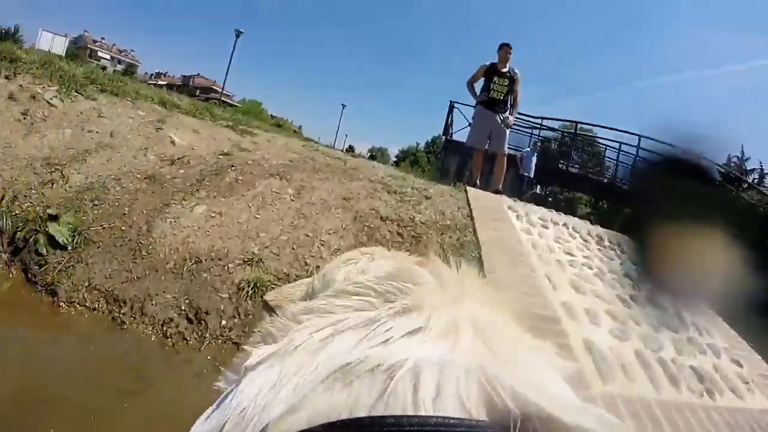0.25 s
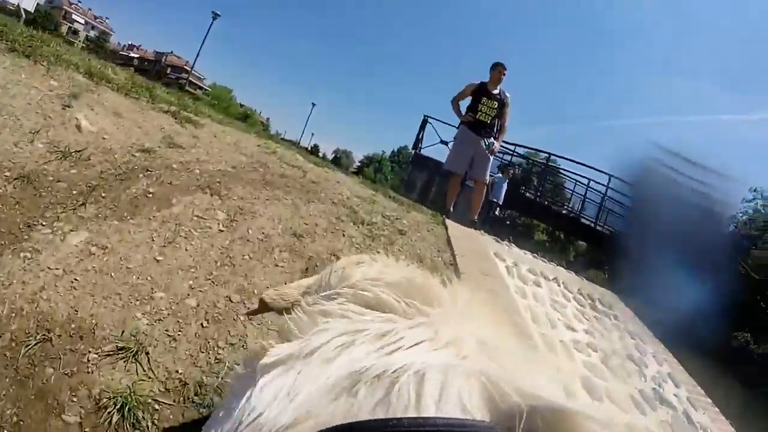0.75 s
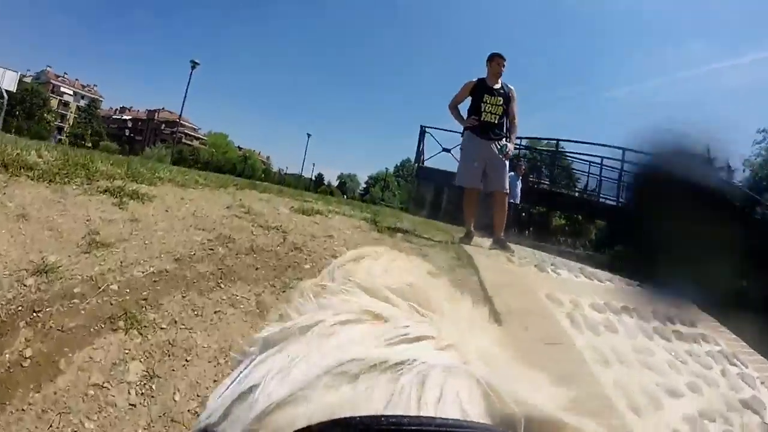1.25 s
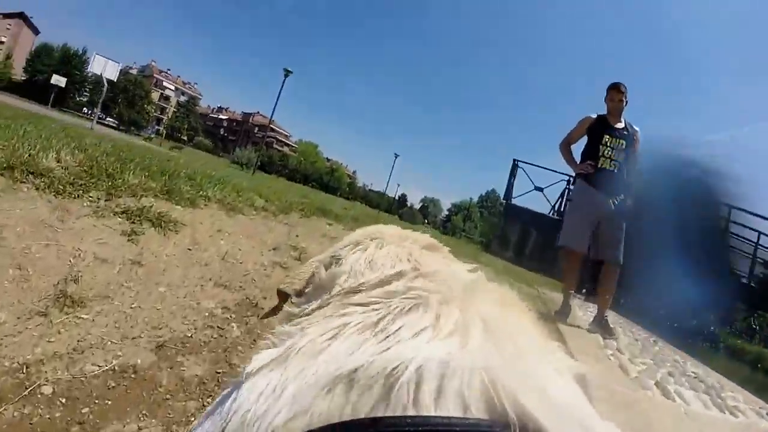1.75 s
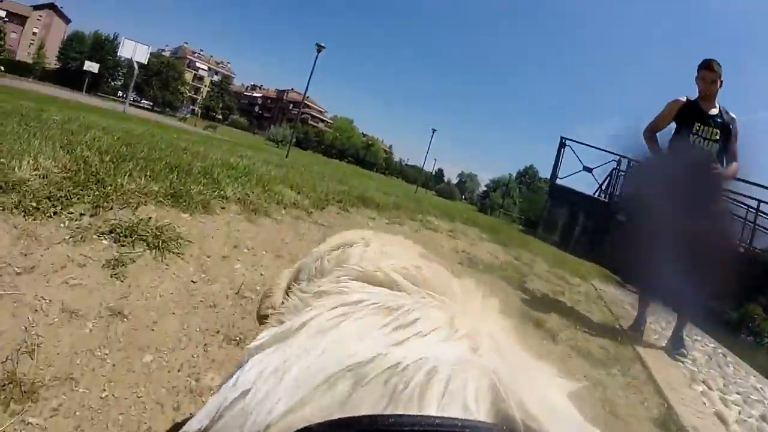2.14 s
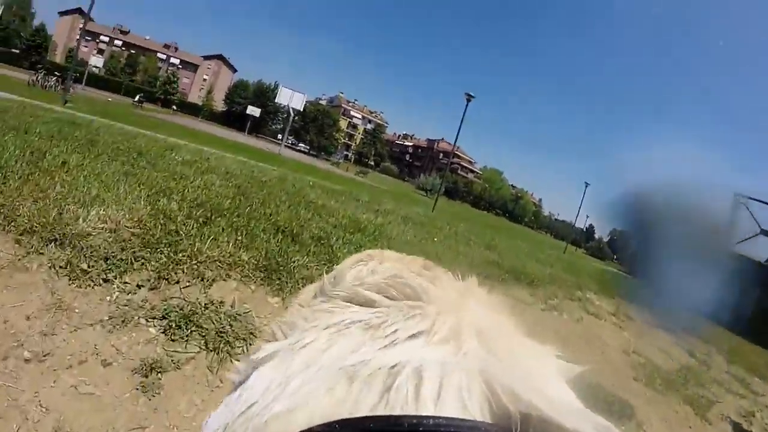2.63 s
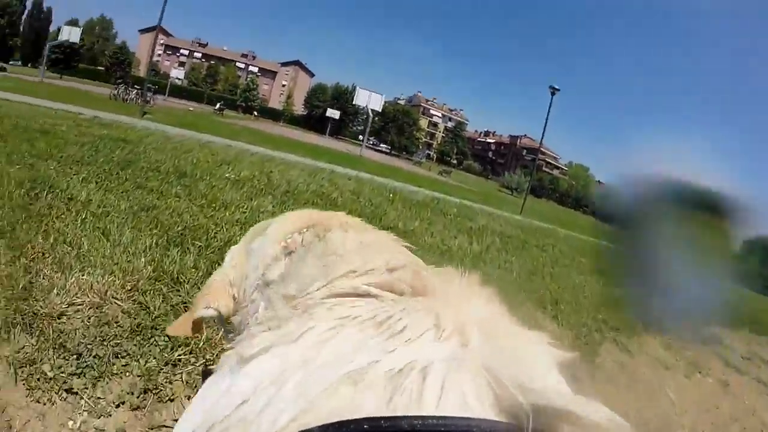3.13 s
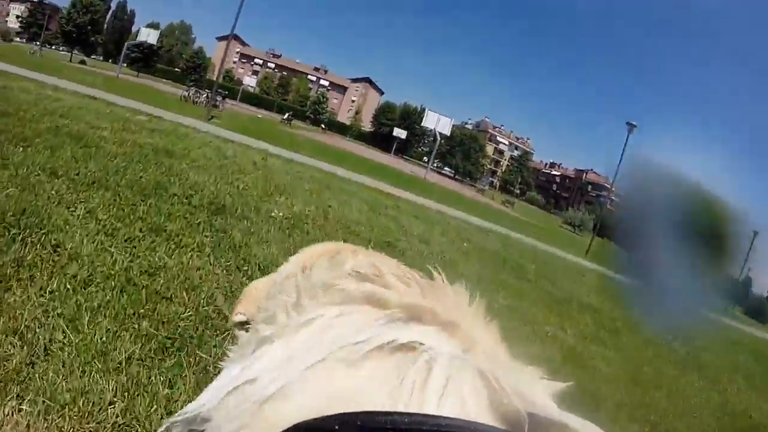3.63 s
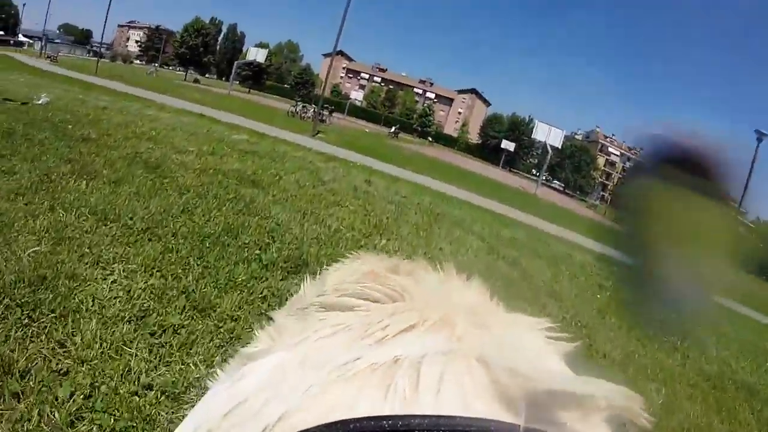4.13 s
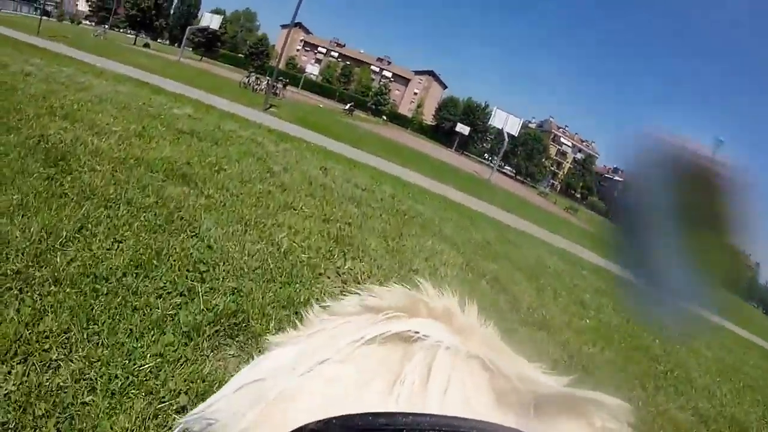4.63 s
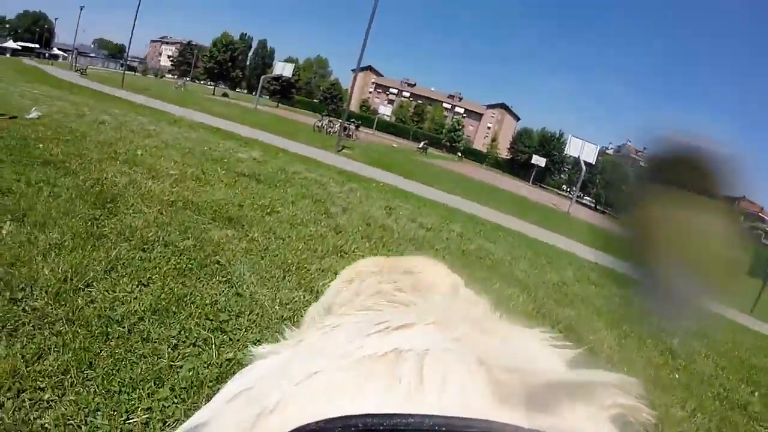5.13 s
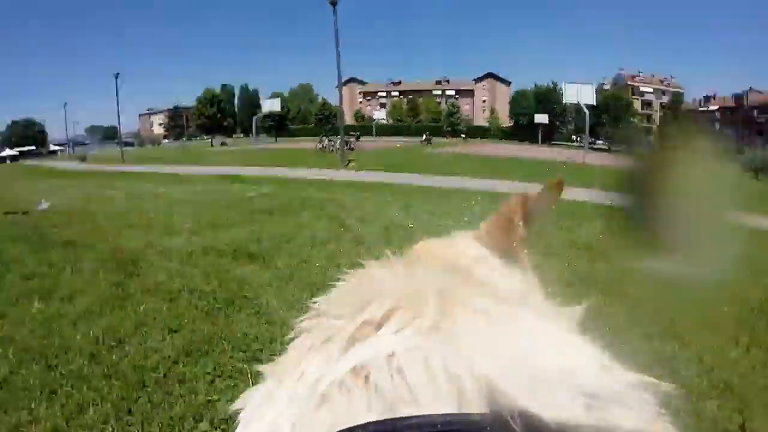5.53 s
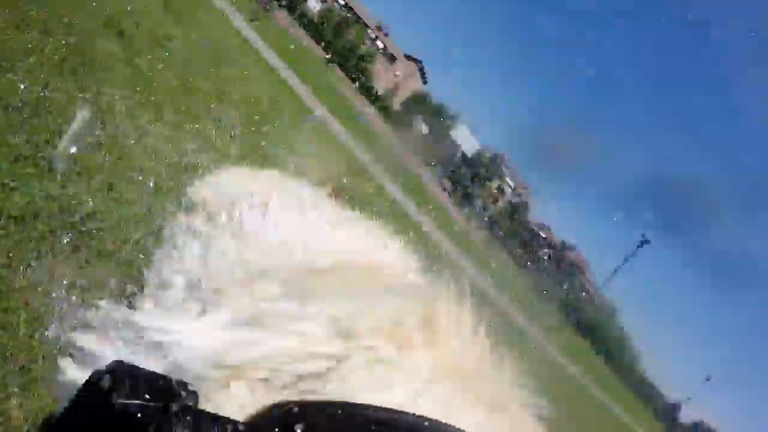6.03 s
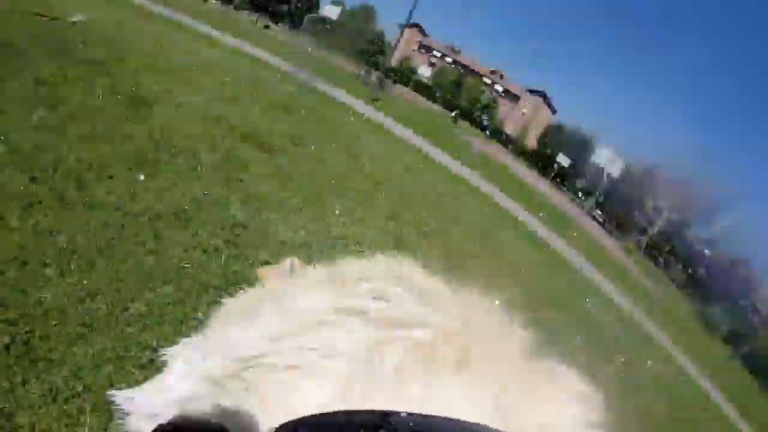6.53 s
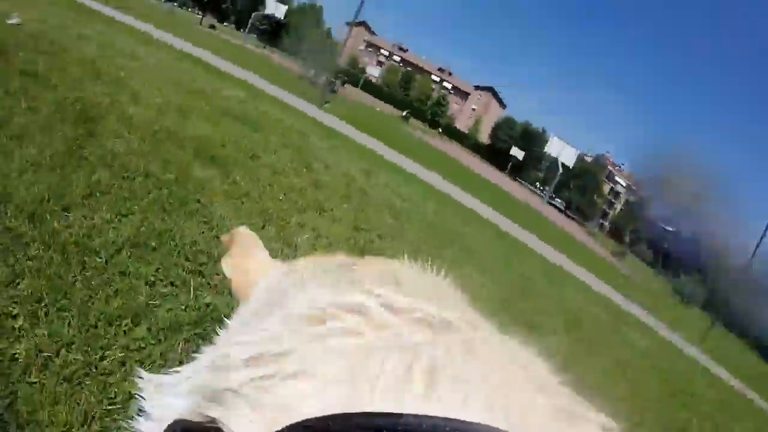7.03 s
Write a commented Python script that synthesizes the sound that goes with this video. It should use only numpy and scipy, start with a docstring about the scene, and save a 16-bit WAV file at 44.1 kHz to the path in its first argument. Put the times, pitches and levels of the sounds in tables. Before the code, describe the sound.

A wet dog climbs a bank, water spattering and plopping off its coat, hard knocks hit the camera case, then it shakes vigorously.

```python
"""A soaked dog climbs a canal bank with a camera in a waterproof case strapped to its back.
First, water streams off its coat: noise grains and small bubbles spatter, splash and gurgle.
Its steps rock the mount as swells of low noise, while short clacks and ringing modes knock the case.
Then it shakes itself on the grass: each twist flings grains of spray at the case, the wet coat flaps
and the buckle clacks, while low pulses jolt the harness. A quiet hush of noise lies under it all."""
import sys
import numpy as np
from scipy import signal
from scipy.io import wavfile
from scipy.ndimage import uniform_filter1d, minimum_filter1d

SR = 44100
rng = np.random.default_rng(int(sys.argv[2]) if len(sys.argv) > 2 else 0)


def log_audio(samples):
    """Write samples as a 16-bit WAV file to the path given in sys.argv[1]."""
    # one column per channel
    frames = np.atleast_2d(samples).T
    # limit to full scale, then quantise
    limited = np.clip(frames, -1, 1)
    pcm = np.round(limited * 32767).astype(np.int16)
    wavfile.write(sys.argv[1], SR, pcm)


N = 321048
T = np.arange(N) / SR  # time of every sample [s]

# Levels in the tables are relative: the sources below may scale them further.
# colour of the outdoor hush: (frequency [Hz], level per Hz [dB])
AIR_TONE = [(88, -29.5), (150, -3.5), (209, -5), (504, -9.5), (555, -10), (1210, -15.5), (1600, -17.5),
            (2270, -18), (7040, -32), (12200, -40), (14000, -52.5), (16000, -69)]
# slow level changes of the hush: (time [s], level [dB])
HUSH_LEVEL = [(0, -0.5), (5.55, 0), (5.75, 1.5), (6.7, -6), (7.28, -5.5)]

# water running off the coat: (time [s], level [dB])
RUNOFF_LEVEL = [(0.0, -46.5), (0.24, -51), (0.33, -45), (.46, -47.5), (.55, -45), (0.70, -46.5),
                (.8, -51.5), (.88, -49.5), (1.0, -53.5), (1.3, -58.5), (1.85, -67)]
# its spatter on the bank, with the hollow resonances of the case: (frequency [Hz], level per Hz [dB])
RUNOFF_TONE = [(150, -3.5), (350, 0), (620, -7), (750, 0), (1100, -2), (1250, -.5), (1350, -3), (1500, 3),
               (1620, -2.5), (1780, 4.5), (2000, 0.5), (2220, -5), (2750, -2.5), (2950, -9.5), (3250, -5.5),
               (4200, -14.5), (4600, -10.5), (5000, -17.5), (6500, -17), (9500, -25), (13000, -29),
               (16000, -65)]
# a gush leaves the coat all at once: (time [s], level [dB])
GUSHES = [(0.305, -64), (0.67, -47), (0.835, -51), (1.214, -44), (1.747, -43.5)]
# thin trickles tick on the stones: (time [s], level [dB])
TRICKLE_LEVEL = [(.05, -89), (.12, -54.5), (.25, -66), (.56, -61), (.72, -56.5), (.9, -61), (1.12, -67),
                 (1.2, -54.5), (1.27, -65)]
# their fine ticking: (frequency [Hz], level per Hz [dB])
TRICKLE_TONE = [(1000, -23), (2700, 6), (4500, 0), (5200, 0), (6400, 2), (8000, -17), (9300, -8),
                (13000, -18), (16000, -31)]

# lumps of water splash into the shallows: (time [s], level [dB], centre frequency [Hz], decay [s])
SPLASHES = [(.306, -37, 1580, 0.0067), (.31, -38.5, 950, 0.007), (.319, -33, 600, .005),
            (.329, -37, 1100, 0.01), (0.346, -43, 520, .005), (.491, -30.5, 770, 0.0047),
            (.492, -31, 417, 0.0066), (0.491, -36, 1200, 0.0045), (.676, -41, 2500, .012),
            (.531, -40, 850, .012), (.536, -38, 1350, 0.01), (0.55, -45, 4050, 0.01),
            (.725, -42, 1400, 0.023), (.841, -35, 1080, 0.0058), (1.007, -41.5, 1430, 0.018),
            (1.044, -45.5, 1720, .02), (1.216, -37, 1920, 0.0054), (1.358, -46, 2040, 0.0067),
            (1.737, -40, 1650, 0.0036), (1.746, -47, 2200, 0.013)]
# single drops plop and plink: (time [s], level [dB], bubble frequency [Hz])
PLOPS = [(.01, -36.5, 518), (.042, -35, 1570), (.078, -37, 3140), (.095, -35.5, 1770), (.105, -36, 6640),
         (.151, -48, 3370), (.215, -40, 4500), (.309, -29, 1680), (.493, -33, 745), (.535, -33, 710),
         (.537, -41, 1250), (.538, -29, 1450), (.631, -30, 1580), (.671, -35, 3200), (.696, -32, 1720),
         (.774, -40, 9100), (.842, -36, 3440), (.851, -32, 1700), (.879, -30.5, 1740), (1.012, -40, 1170),
         (1.046, -31, 2010), (1.056, -36, 1530), (1.119, -40, 6530), (1.218, -34, 1850)]
# a hollow in the water fills: (time [s], level [dB], length [s], starting frequency [Hz])
GURGLES = [(0.364, -39.5, 0.045, 1040), (.548, -39, .055, 765)]

# low rumble of the sway: (frequency [Hz], level per Hz [dB])
SWAY_TONE = [(8, -21.5), (15, 11.5), (24, 4), (38, 0), (52, -13.5), (75, -33), (140, -63), (400, -120)]
# low rumble of the thuds: (frequency [Hz], level per Hz [dB])
THUD_TONE = [(30, -26), (48, -0.5), (62, 0.5), (80, -6.5), (105, -13.5), (150, -29), (250, -39.5),
             (600, -64), (1500, -120)]
# strides up the bank, mostly about 0.4 s apart: (time [s], sway of the body [dB])
STRIDES = [(0.0, -15), (0.46, -21), (0.84, -17.5), (1.208, -14.5), (1.588, -14.5), (1.92, -16),
           (2.36, -18.5), (2.77, -24), (3.16, -23.5), (3.568, -19.5), (3.95, -22.5), (4.46, -19.5),
           (4.74, -23.5), (4.96, -31.5), (5.15, -31.5), (5.38, -20)]
# each paw lands: (time [s], thud [dB])
PAWS = [(.13, -34.5), (.27, -39), (.475, -29.5), (.70, -29), (.84, -28), (.95, -29.5), (1.215, -37),
        (1.27, -27.5), (1.39, -37), (1.585, -30), (1.735, -39), (1.915, -27.5), (2.02, -54), (2.13, -38.5),
        (2.375, -30), (2.5, -39), (2.79, -24), (2.88, -38), (3.03, -47), (3.175, -34.5), (3.3, -42),
        (3.575, -33), (3.7, -44.5), (3.97, -32), (4.1, -49.5), (4.475, -27), (4.59, -36.5), (4.745, -38.5),
        (4.88, -41.5), (4.98, -38), (5.11, -31.5), (5.24, -42), (5.41, -31)]
# vigour of the shake, from the head back to the rump: (time [s], level [dB])
SHAKE_LEVEL = [(5.56, -13.5), (5.68, -9.5), (5.95, -13), (6.45, -14.5), (6.75, -14), (7.15, -10),
               (7.28, -20)]
# the harness snaps taut: (time [s], peak level [dB])
JOLTS = [(0.493, -16), (0.97, -16), (1.752, -18.5), (2.445, -22), (3.612, -15), (3.72, -19), (5.72, -6.5),
         (5.927, -3), (6.117, -4), (6.305, -4), (6.48, -3), (6.696, -8), (6.825, -10.5), (6.913, -11),
         (6.958, -4.5), (7.078, -4), (7.152, -11)]
# the swing gets faster once the shake has passed the shoulders: (time [s], frequency [Hz])
SWING_RATE = [(6.5, 28.5), (6.8, 47)]

# short grainy scuffs, scrapes and soft thumps of strap, coat and mount:
# (loudest time [s], level [dB], half length [s], centre frequency [Hz], Q [-])
SCUFFS = [(1.421, -54, 0.043, 890, 1.4), (1.954, -36.5, 0.011, 374, 2.8), (1.955, -36.5, 0.011, 1020, 0.79),
          (2.013, -55, 0.06, 1040, 0.73), (2.601, -53, 0.05, 870, 1.3), (2.782, -59, 0.037, 2130, 2.3),
          (4.072, -55.5, 0.057, 990, 2.2), (4.577, -43.5, 0.0095, 456, 0.66),
          (4.581, -56, 0.028, 2024, 3.1), (4.585, -45.5, 0.0098, 730, 2.5), (4.612, -36, 0.0058, 318, 1.3),
          (4.697, -53.5, 0.034, 1690, 3.7), (4.688, -55.5, 0.036, 2470, 4), (5.084, -62, 0.06, 1870, 1.25),
          (5.447, -50.5, 0.034, 2360, 2.3), (5.45, -54.5, 0.05, 1180, 0.88),
          (6.864, -48.5, 0.0064, 750, 0.67), (6.912, -54, 0.013, 750, 0.49),
          (6.991, -45.5, 0.0073, 750, 0.8), (7.044, -52.5, 0.0076, 750, 0.45),
          (7.115, -55, 0.0082, 750, .7)]

# mount and harness strike the case, most often in quick bounces: (time [s], strength [dB],
# clack pitch [Hz], clack length [cycles], ringing of the case [dB], push on the mount [dB])
KNOCKS = [(1.947, -24.5, 1990, 1.3, -12, 0), (1.952, -28, 1890, 0.49, -21, -9),
          (1.955, -25.5, 2300, 1.4, -1, 1.5), (1.961, -28, 1910, 0.76, -11, -17),
          (2.330, -22.5, 750, 0.62, -16, -10), (2.3319, -8, 2170, 1.17, -10.5, -23.5),
          (2.3326, -14.5, 3040, 1, -29, -28), (2.3352, -20.5, 2130, 1.1, -5, -23),
          (2.623, -26, 830, 1.4, -2, -7.5), (2.627, -11.5, 3250, 3.6, -4, -39),
          (2.6281, -5.5, 2500, 1.8, -3.5, -31.5), (2.6269, -19.5, 467, 0.73, -20, -20),
          (2.6282, -23, 5670, 7.5, -22, -40), (2.629, -14.5, 1220, 1.6, -7, -12.5),
          (2.6308, -15, 1690, 1, -8, -34), (2.6324, -20, 2550, 0.82, -9.5, -13),
          (2.6373, -25.5, 1800, 0.32, 3, -5.5), (2.6416, -32, 2200, .9, -6.5, -21),
          (2.654, -38.5, 1900, .6, -3, -20), (2.659, -35, 2400, 0.83, -3, -25),
          (2.666, -38, 1100, 0.45, -3, -20), (2.6693, -34, 2300, 0.63, -5, -25),
          (2.6915, -36, 2160, 0.8, -9, -27), (4.2738, -7.5, 2980, 0.78, -5.5, -39),
          (4.2757, 11.5, 2440, 0.78, -12.5, -38), (4.2787, -3, 900, 0.53, -12.5, -15.5),
          (4.2799, 8.5, 1536, 0.94, -13.5, -23), (4.2827, -3.5, 1520, 1.4, -9.5, -26),
          (4.3273, -14.5, 2300, 0.72, -8, -34), (4.328, -22, 1544, 0.88, -15.5, -39),
          (4.351, -18.5, 2100, 0.32, -7, -31), (4.3526, -26, 1580, 0.97, -15, -29.5),
          (4.3705, -31.5, 2515, 0.8, -14, -30), (4.372, -34.5, 1520, 1, -14, -36),
          (5.5542, -15.5, 970, 0.33, -34, -5), (5.5554, -23, 1720, 0.57, -26, -19),
          (5.5801, -24, 610, 0.58, 5, 2), (5.583, -23, 2380, 0.55, 2, -15),
          (5.593, -0.5, 2280, 0.9, -16, -40), (5.642, -38, 1100, .4, -5, -10),
          (5.672, -27, 298, 0.43, -22, -2), (7.072, -40.5, 645, 0.19, -19, 13.5)]
# ringing modes of the camera case: (frequency [Hz], level [dB], time to fall 60 dB [s])
CASE_MODES = [(204, -28.5, 0.019), (515, -15, 0.014), (740, -6, 0.019), (1220, -3, 0.01),
              (1520, -2.5, 0.0081), (2320, -6, 0.026), (2550, -17, 0.0046), (3200, -2, 0.015),
              (4560, -10.5, 0.013), (5460, -10, 0.013), (5740, -16, 0.0081), (6740, -35.5, 0.0068),
              (7660, -20, 0.0064), (8820, -14.5, 0.0099), (11200, -35.5, 0.0015), (14260, -26.5, .005)]
# gritty scrape of a contact: (frequency [Hz], level per Hz [dB])
GRIT_TONE = [(200, -3), (700, 7), (3200, 4.5), (4800, -16.5), (5700, -12.5), (7000, -10.5), (9500, -13),
             (12000, -23), (16000, -39)]
# buzz of the loose mount after a contact: (frequency [Hz], level per Hz [dB])
BUZZ_TONE = [(300, -10.5), (1200, -6), (2300, -0.5), (3300, -7.5), (4500, -15), (5700, -13), (7000, -21.5),
             (10000, -24), (16000, -46)]
# a square hit leaves a metal part of the mount singing: (time [s], level [dB])
PINGS = [(2.332, -35), (4.277, -37), (5.594, -29)]

# twists of the body, about ten a second, then a few slow ones of the rump:
# (time [s], swish of the fur [dB], clack of the buckle [dB])
TWISTS = [(5.692, -30.5, -33), (5.799, -32, -31), (5.8976, -34.5, -20.5), (5.9891, -35.5, -18),
          (6.085, -35, -18), (6.184, -40, -21), (6.273, -37, -18.5), (6.3661, -41, -19),
          (6.453, -38.5, -19), (6.530, -42.5, -29), (6.626, -43.5, -22), (6.863, -54, -32),
          (6.992, -49, -30), (7.120, -44, -28)]
# slap of wet fur: (frequency [Hz], level per Hz [dB])
SLAP_TONE = [(150, 0), (400, 9.5), (750, 4), (950, -18.5), (1300, -8), (2300, -9), (3300, -12), (5000, -29),
             (16000, -51)]
# largest drops flung against the case: (time [s], peak level [dB], burst decay [s], treble [dB])
DROPS = [(5.5893, -11.5, 0.0024, 8), (5.692, -18.5, 0.0022, 8), (5.711, -13, 0.0014, -9),
         (5.737, -35, 0.0049, -9), (5.7522, -28.5, 0.0015, -22), (5.8026, -18, 0.0025, 8),
         (5.8153, -26, 0.004, 12), (5.824, -22, 0.0025, 17), (5.841, -37, 0.007, -1),
         (5.919, -35, 0.0033, 3), (5.926, -26, 0.004, -5), (5.953, -31, 0.0037, -21),
         (5.9594, -30, 0.0036, -22), (5.974, -39, 0.0029, -13), (6.006, -32, 0.0015, -1),
         (6.033, -41, 0.0018, 4), (6.044, -41, 0.0035, 9), (6.091, -20.5, 0.0022, 2),
         (6.112, -34.5, 0.0018, -7), (6.127, -42, .002, -1), (6.1426, -46, 0.0011, -8),
         (6.1593, -34, 0.0025, -6), (6.2027, -29.5, 0.0012, 8), (6.2967, -32, 0.0029, -4),
         (6.3774, -31, 0.0023, 5), (6.384, -39, .003, -3), (6.4054, -42, .002, -2),
         (6.469, -35, 0.0039, -14), (6.476, -43, 0.003, -12), (6.489, -47, .002, -14),
         (6.55, -39, .001, -7), (6.574, -46.5, .001, -14), (6.612, -43, 0.00091, -16),
         (6.648, -41, 0.0018, -18), (6.653, -41, .002, -16), (6.716, -46, 0.0011, -17),
         (6.826, -48, 0.0011, -7), (7.015, -46, 0.0018, -10), (7.1442, -40.5, 0.0035, 0),
         (7.2001, -38, .001, -2), (7.236, -49, .001, -13)]
# slap of a drop on the case: (frequency [Hz], level per Hz [dB])
DROP_TONE = [(200, 3.5), (900, -13), (1600, -5.5), (2400, 5.5), (3300, -0.5), (4800, -9), (5600, -1.5),
             (6500, -14), (7300, -19), (8800, -11), (10500, -20), (15000, -21), (16500, -44)]
# fine spray between the twists: (time [s], level [dB])
MIST_LEVEL = [(5.33, -69), (5.44, -54), (5.6, -46.5), (5.87, -43.5), (5.98, -37), (6.05, -46.5),
              (6.6, -46.5), (6.78, -54), (7.1, -55), (7.28, -63)]
# patter of the spray: (frequency [Hz], level per Hz [dB])
SPRAY_TONE = [(80, 18), (170, 15.5), (330, 6), (550, 4), (740, 5), (900, -2), (1200, 3.5), (1600, -5),
              (2300, -2.5), (2900, -12), (3500, -17.5), (4200, -26.5), (5700, -42), (7000, -49),
              (16000, -55.5)]
# fine droplets sizzle on the case: (frequency [Hz], level per Hz [dB])
SIZZLE_TONE = [(500, -32), (1500, -12.5), (2000, 10.5), (2500, 1), (3250, 1), (3800, -23), (4900, -25),
               (5500, -15.5), (6000, -9.5), (6600, -22), (9000, -28), (13000, -41), (16000, -44)]
# light taps of the slack buckle between its clacks: (time [s], level [dB])
TAPS = [(5.788, -28), (5.906, -34), (5.982, -25), (6.000, -37), (6.061, -26.5), (6.169, -27), (6.174, -31),
        (6.251, -32), (6.289, -35), (6.354, -31), (6.434, -29), (6.464, -33), (6.541, -26.5),
        (6.664, -32.5), (7.138, -44)]


def amp(db):
    """Turns decibels into a gain."""
    return 10 ** (np.asarray(db) / 20)


def unit(x):
    """Scales a sound to an average strength (rms) of 1."""
    return x / np.sqrt(np.mean(x ** 2) + 1e-20)


def level(curve):
    """Gain over time from (time, dB) rows, fading to silence within 0.1 s outside them."""
    s, db = np.transpose(curve)
    fade = np.interp(T, [s[0] - 0.1, s[0], s[-1], s[-1] + 0.1], [0, 1, 1, 0])
    return amp(np.interp(T, s, db)) * fade


def swell(events, attack_s, hold_s, release_s):
    """Gain over time: each (time, dB) event rises, holds and dies away."""
    t, out = np.arange(SR) / SR, np.zeros(N)
    rise = np.minimum(t / attack_s, 1)
    fall = np.exp(-np.maximum(t - attack_s - hold_s, 0) / release_s)
    for s, db in events:
        add(out, s, amp(db) * rise * fall)
    return out


def add(mix, s, sound):
    """Mixes a sound in at time s."""
    part = mix[max(round(s * SR), 0):][:len(sound)]
    part += sound[:len(part)]


def response(tone, size=4096):
    """Makes a short filter with the given tone colour that acts as early as it can."""
    hz, db = np.transpose(tone)
    f = abs(np.fft.fftfreq(size, 1 / SR))
    tone_db = np.interp(np.log(f + 1), np.log(hz + 1), db)
    log_gain = np.log(amp(np.maximum(tone_db, -120)))
    # the Hilbert transform finds the phase that puts no sound before the start
    spectrum = np.exp(np.conj(signal.hilbert(log_gain)))
    return np.fft.ifft(spectrum).real[:size // 2]


def colour(x, tone, size=4096):
    """Gives x a tone colour, at rms 1."""
    return unit(signal.oaconvolve(x, response(tone, size=size))[:N])


def band(x, hz, q):
    """Keeps a band around hz by filtering twice, at rms 1."""
    b, a = signal.iirpeak(hz, q, fs=SR)
    once = signal.lfilter(b, a, x)
    return unit(signal.lfilter(b, a, once))


def muffle(x, hz):
    """Takes off the treble above hz."""
    return signal.lfilter(*signal.butter(2, min(hz, 0.45 * SR), fs=SR), x)


def burst(tone, t, decay_s):
    """A puff of coloured noise that dies away."""
    noise = colour(rng.standard_normal(len(t)), tone, size=512)
    return noise[:len(t)] * np.exp(-t / decay_s)


def patter(per_s, spread_db):
    """Random impacts of either sign: many small, a few large."""
    size = amp(spread_db * np.minimum(rng.exponential(1, N), 4))
    sign = rng.choice([-1, 1], N)
    lands = rng.random(N) < per_s / SR
    return size * sign * lands


def clumps(depth_db, size):
    """An uneven flow of rms 1, in clumps about size samples long."""
    slow_noise = unit(uniform_filter1d(rng.standard_normal(N), size=size))
    return unit(amp(depth_db * slow_noise))


def bubble(hz, cycles, rise):
    """An air pocket rings and fades; a positive rise lifts its pitch as it nears the surface."""
    turns = np.arange(int(5 * cycles * SR / hz)) * hz / SR
    tone = np.sin(2 * np.pi * turns * (1 + rise * turns / cycles))
    return tone * np.exp(-turns / cycles) * (1 - np.exp(-2 * turns))


def rumble(tone):
    """Low noise with its slow swells evened out."""
    x = colour(rng.standard_normal(N), tone, size=32768)
    power = uniform_filter1d(abs(signal.hilbert(x)) ** 2, size=3000)
    return unit(x / np.sqrt(power + 0.02))


def case_ring(t, uneven_db=2.5):
    """One blow on the case: the spot that is struck favours some modes over others."""
    spot_db = uneven_db * rng.standard_normal(len(CASE_MODES))
    return sum(amp(db + lift - 60 * t / t60) * np.sin(2 * np.pi * hz * t)
               for (hz, db, t60), lift in zip(CASE_MODES, spot_db))


def contact(hz, cycles, ring_db, case_db=-7, grit_db=-21, grit_s=0.0026, hard_hz=2400,
            buzz_db=-33, buzz_s=0.0078):
    """A contact clacks for a few cycles, grittier at higher pitch; the case rings and the mount buzzes."""
    t = np.arange(SR // 8) / SR
    u = hz * t / cycles
    clack = u * np.exp(1 - u) * np.sin(2 * np.pi * hz * t)
    ring = amp(case_db + ring_db) * case_ring(t)
    hardness = min(hz / hard_hz, 1) ** 2
    grit = amp(grit_db) * hardness * burst(GRIT_TONE, t, grit_s)
    buzz = amp(buzz_db) * burst(BUZZ_TONE, t, buzz_s)
    return clack + ring + grit + buzz


def twisting(lead_s=0.018):
    """How fast the wet coat moves: one swell per twist, starting just before the buckle clacks."""
    starts = [(s - lead_s, swish_db) for s, swish_db, _ in TWISTS]
    return swell(starts, attack_s=0.016, hold_s=0.032, release_s=0.01)


def air(air_db=-53.5):
    """The outdoor hush is coloured noise whose level drifts slowly."""
    return amp(air_db) * level(HUSH_LEVEL) * colour(rng.standard_normal(N), AIR_TONE)


def runoff(spatter_db=-2, bubbles_db=-4, trickle_db=0):
    """Strings of water spatter on the bank and whip up small bubbles; thin trickles tick above them."""
    spatter = patter(per_s=1500, spread_db=1.0) * clumps(depth_db=3.3, size=500)
    fizz = np.zeros(N)
    for hz in np.geomspace(600, 9000, num=30):  # pitches spread evenly over the octaves
        starts = patter(per_s=24, spread_db=1.5)
        bubbles = signal.oaconvolve(starts, bubble(hz, cycles=8.0, rise=0.0363))[:N]
        fizz += unit(bubbles) * np.sqrt(hz)
    flow = level(RUNOFF_LEVEL) + swell(GUSHES, attack_s=0.0046, hold_s=0, release_s=0.0067)
    water = amp(spatter_db) * colour(spatter, RUNOFF_TONE) + amp(bubbles_db) * colour(fizz, RUNOFF_TONE)
    ticks = colour(patter(per_s=700, spread_db=0.5), TRICKLE_TONE)
    return flow * water + amp(trickle_db) * level(TRICKLE_LEVEL) * ticks


def splashes(attack_s=0.0015, gurgle_cycles=5.0, gurgle_rise_oct_per_s=8.3, gurgle_scatter_oct=0.15):
    """Lumps splash as noise, drops plop, and a filling hollow lets go bubbles that tend to get smaller."""
    t, out = np.arange(SR // 10) / SR, np.zeros(N)
    for s, db, hz, decay_s in SPLASHES:
        noise = band(rng.standard_normal(len(t)), hz, q=1.0)
        add(out, s, amp(db) * noise * np.minimum(t / attack_s, 1) * np.exp(-t / decay_s))
    for s, db, hz in PLOPS:
        add(out, s, amp(db) * bubble(hz, cycles=5.4, rise=0.0062))
    for s, db, length_s, hz in GURGLES:
        for lag_s in length_s * rng.random(size=5):
            # smaller bubbles ring higher
            octaves = gurgle_rise_oct_per_s * lag_s + gurgle_scatter_oct * rng.standard_normal()
            add(out, s + lag_s, amp(db) * bubble(hz * 2 ** octaves, cycles=gurgle_cycles, rise=0.018))
    return out


def mount(idle_sway_db=-35, sway_db=-4, shake_sway_db=-3,
          idle_thud_db=-46.5, thud_db=-3.5, shake_thud_db=-12):
    """Strides rock the camera and paws thud through the strap; the shake also rocks and jolts it."""
    sway = swell(STRIDES, attack_s=0.0078, hold_s=0.13, release_s=0.11)
    thud = swell(PAWS, attack_s=0.0078, hold_s=0.029, release_s=0.055)
    shake = level(SHAKE_LEVEL)
    sway_gain = amp(idle_sway_db) + amp(sway_db) * sway + amp(shake_sway_db) * shake
    thud_gain = amp(idle_thud_db) + amp(thud_db) * thud + amp(shake_thud_db) * shake
    out = sway_gain * rumble(SWAY_TONE) + thud_gain * rumble(THUD_TONE)
    t = np.arange(-SR // 20, SR // 20) / SR
    for s, db in JOLTS:
        swing_hz = np.interp(s, *np.transpose(SWING_RATE))
        u = 2 * np.pi * swing_hz * t
        add(out, s + t[0], amp(db) * u * np.exp((1 - u ** 2) / 2))  # one push down, one up
    return out


def scuffs():
    """Short scuffs, scrapes and soft thumps of strap, coat and mount: grains in a band that swell and fade."""
    t, out = np.arange(-SR // 5, SR // 5) / SR, np.zeros(N)
    for s, db, half_s, hz, q in SCUFFS:
        grains = patter(per_s=1500, spread_db=3.0)[:len(t)]
        add(out, s + t[0], amp(db) * band(grains, hz, q=q) * np.exp(-(t / half_s) ** 2))
    return out


def knocks(push_hz=180, full_blow_hz=21000, softening_db_per_oct=16):
    """Each blow is a contact on the case with a low push on the mount; gentle blows are duller."""
    out = np.zeros(N)
    u = 2 * np.pi * push_hz * np.arange(SR // 40) / SR
    push = u * (2 - u) * np.exp(1 - u)
    for s, db, hz, cycles, ring_db, push_db in KNOCKS:
        edge_hz = full_blow_hz * 2 ** (db / softening_db_per_oct)
        add(out, s, amp(db) * muffle(contact(hz, cycles, ring_db), edge_hz))
        add(out, s, amp(db + push_db) * muffle(push, edge_hz))
    return out


def pings(ping_hz=2130, t60_s=0.081):
    """A metal part sings after a square hit: one pure tone dying away."""
    t, out = np.arange(SR // 5) / SR, np.zeros(N)
    for s, db in PINGS:
        add(out, s, amp(db - 60 * t / t60_s) * np.sin(2 * np.pi * ping_hz * t))
    return out


def flaps(flap_db=0, flap_hz=145, slap_db=3, slap_s=0.003, slap_lag_s=0.024):
    """With each twist the heavy wet coat flaps against the harness, then lands on the case."""
    out = amp(flap_db) * twisting() * band(rng.standard_normal(N), flap_hz, q=3.4)
    t = np.arange(SR // 20) / SR
    for s, swish_db, _ in TWISTS:
        add(out, s + slap_lag_s, amp(swish_db + slap_db) * burst(SLAP_TONE, t, slap_s))
    return out


def drops(drop_db=7, splat=0.12, treble_hz=5000):
    """A drop slaps the case and bursts into droplets within a few milliseconds; glancing ones are duller."""
    t, out = np.arange(SR // 40) / SR, np.zeros(N)
    slap = response(DROP_TONE)
    for s, db, burst_s, treble_db in DROPS:
        droplets = splat * rng.standard_normal(len(t)) * np.exp(-t / burst_s)
        hit = signal.fftconvolve((t == 0) + droplets, slap)  # one sharp click, then the droplets
        dull = signal.lfilter(*signal.butter(1, treble_hz, fs=SR), hit)
        hit = dull + amp(treble_db) * (hit - dull)
        add(out, s, amp(db + drop_db) * hit / abs(hit).max())
    return out


def spray(patter_db=0.0, ring_db=-17, crackle_db=-19, sizzle_db=-11, drying_db_per_s=8, soft_hz=3000):
    """Twists throw clumps that patter and ring the case; sizzle and snaps thin out as the coat dries."""
    flow = (level(MIST_LEVEL) + twisting()) * clumps(depth_db=3.0, size=200)
    wetness_db = -drying_db_per_s * np.maximum(T - TWISTS[0][0], 0)
    ring = case_ring(np.arange(SR // 10) / SR)
    soft_ring = signal.lfilter(*signal.butter(1, soft_hz, fs=SR), ring)
    layers = [(patter(per_s=1200, spread_db=3.5), response(SPRAY_TONE), patter_db),
              (patter(per_s=200, spread_db=6.5), soft_ring, ring_db),
              (patter(per_s=1300, spread_db=4.0), response(SIZZLE_TONE), sizzle_db + wetness_db / 2)]
    snaps = np.zeros(N)
    for hz in np.geomspace(1200, 6000, num=8):
        hits = flow * unit(patter(per_s=45, spread_db=6.0))
        snaps += signal.oaconvolve(hits, bubble(hz, cycles=1.3, rise=0.01))[:N]
    out = unit(snaps) * np.std(flow) * amp(crackle_db + wetness_db)
    for hits, sound, db in layers:
        even_sound = sound / np.linalg.norm(sound)
        out += amp(db) * signal.oaconvolve(flow * unit(hits), even_sound)[:N]
    return out


def buckle(clack_hz=2330, cycles=0.97, ring_db=-10, cushion_s=0.0025, chatter_s=0.00293, chatter_db=-7,
           body_hz=760, body_db=-11, fur_hz=4600):
    """Each twist makes the buckle clack and chatter with a hollow undertone, cushioned by wet fur."""
    out, hits = np.zeros(N), list(TAPS)
    for s, _, db in TWISTS:
        hits += [(s, db), (s + chatter_s, db + chatter_db)]
    for s, db in hits:
        clack = contact(clack_hz * rng.uniform(0.77, 1.146), cycles, ring_db)
        cushion = np.minimum(0.5 + T[:len(clack)] / cushion_s, 1)  # starts at half strength
        add(out, s, amp(db) * clack * cushion)
    for s, _, db in TWISTS:
        add(out, s, amp(db + body_db) * bubble(body_hz, cycles=2.2, rise=0))
    return muffle(out, fur_hz)


def scene():
    """Adds all sources together at one microphone."""
    background = air() + runoff() + splashes()
    walk_and_contacts = mount() + scuffs() + knocks() + pings()
    shake = flaps() + drops() + spray() + buckle()
    return (background + walk_and_contacts + shake)[None]


def record(dry, ceiling_db=0.0, recover_db_per_s=12, edge_hz=15900):
    """A limiter ducks just ahead of loud peaks and recovers slowly; then the top treble is cut."""
    over_db = np.maximum(20 * np.log10(abs(dry[0]) + 1e-9) - ceiling_db, 0)
    recovery_db = recover_db_per_s * T
    held_db = np.maximum.accumulate(over_db + recovery_db) - recovery_db
    # look 30 samples ahead, then smooth the gain
    gain_db = uniform_filter1d(minimum_filter1d(-held_db, size=61), size=61)
    low_pass = signal.firwin(255, edge_hz, window=("kaiser", 8), fs=SR)
    return signal.oaconvolve(dry * amp(gain_db), low_pass[None], "same")


dry = scene()
out = record(dry)
log_audio(out)
```